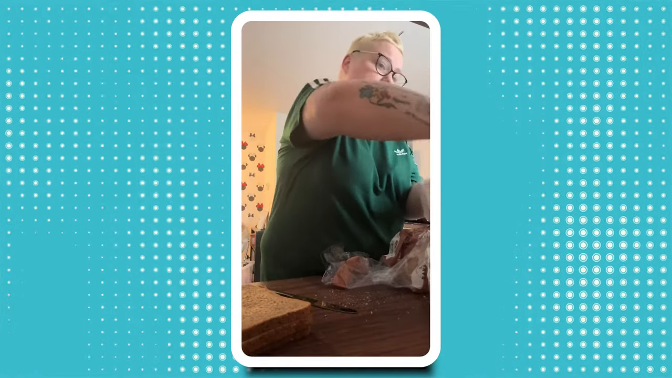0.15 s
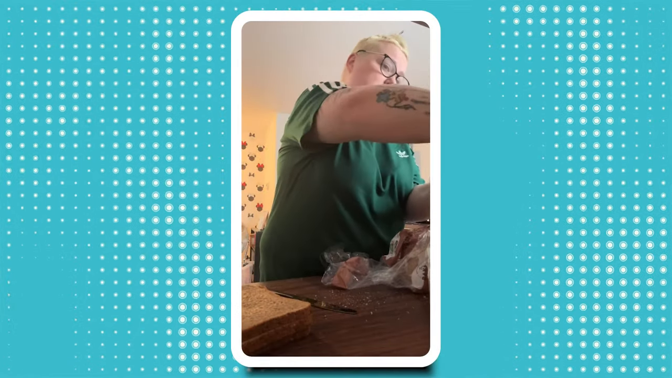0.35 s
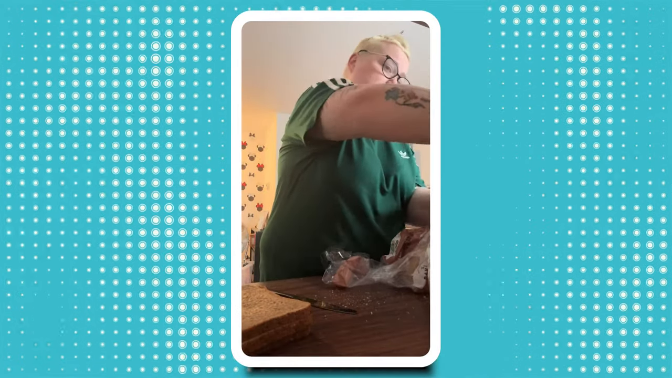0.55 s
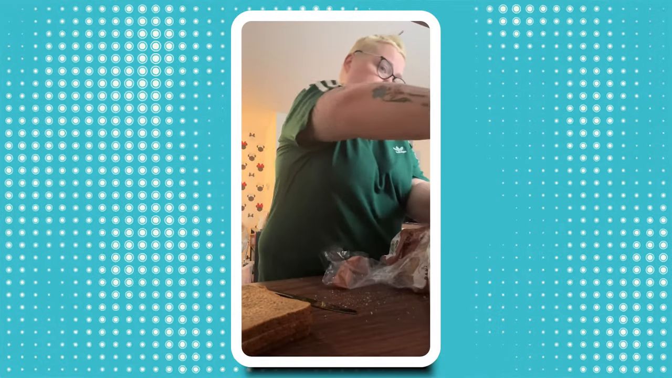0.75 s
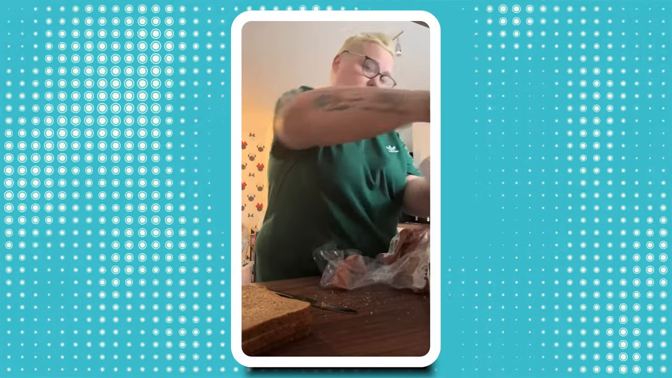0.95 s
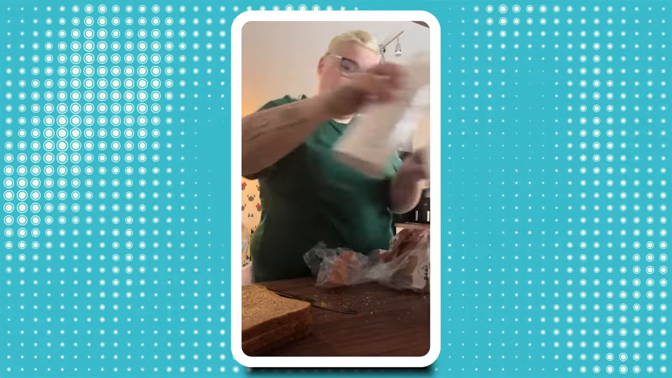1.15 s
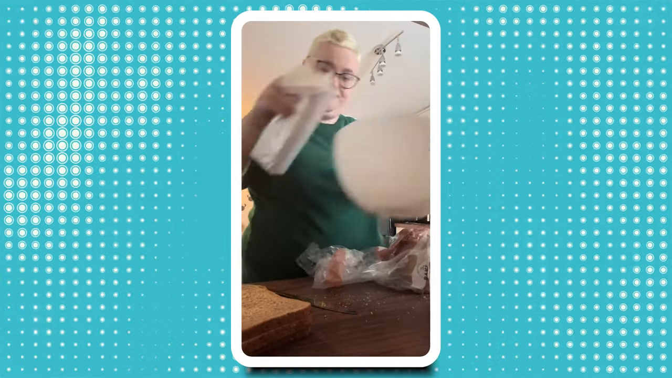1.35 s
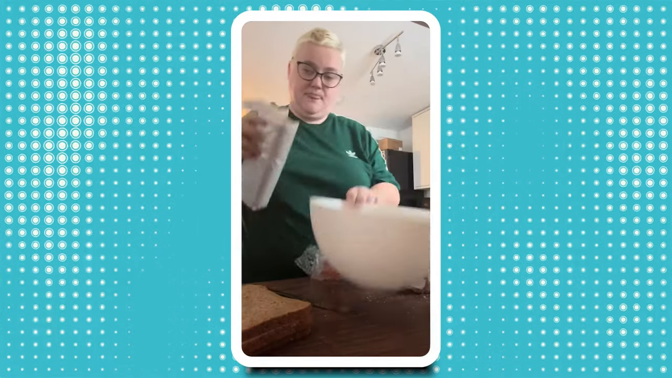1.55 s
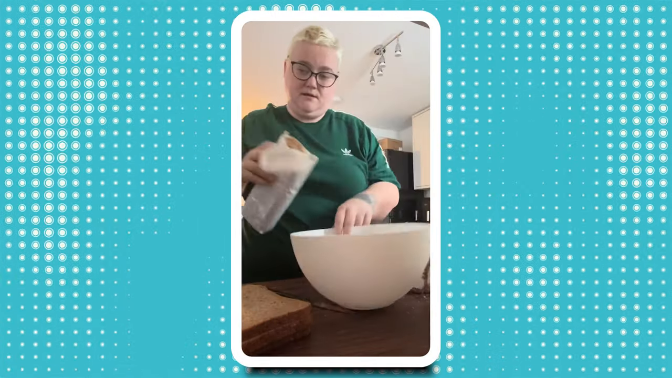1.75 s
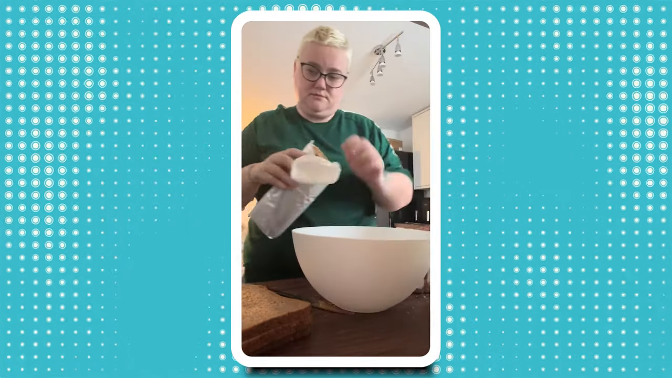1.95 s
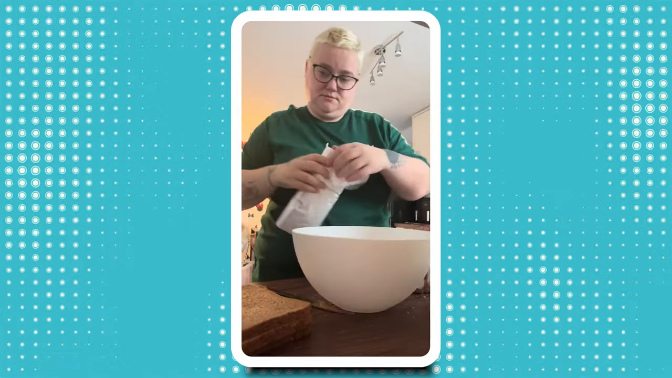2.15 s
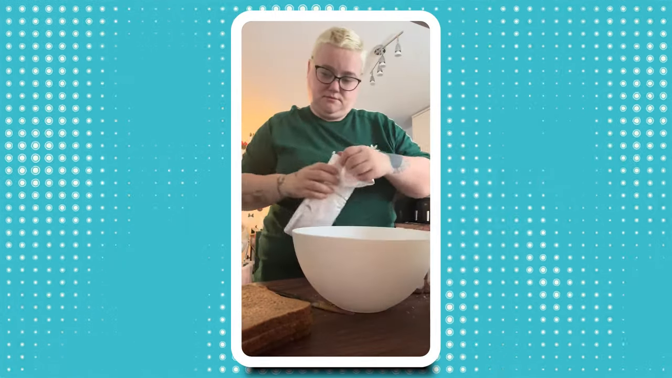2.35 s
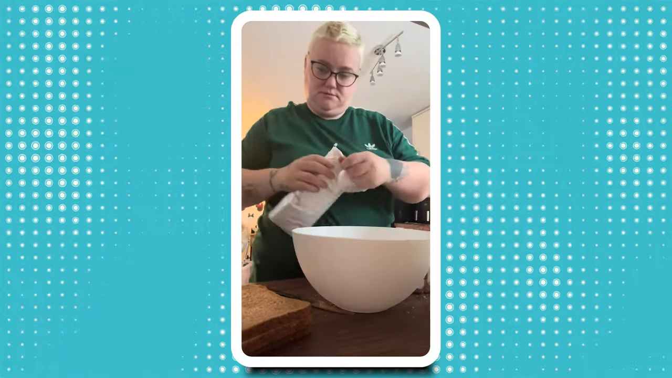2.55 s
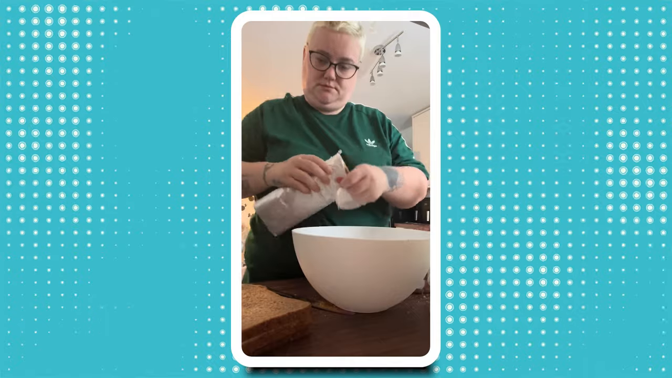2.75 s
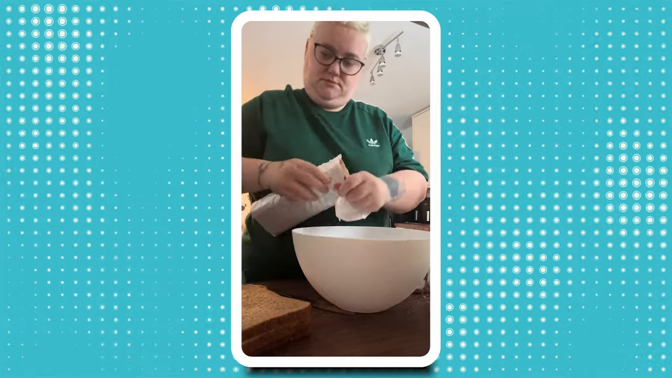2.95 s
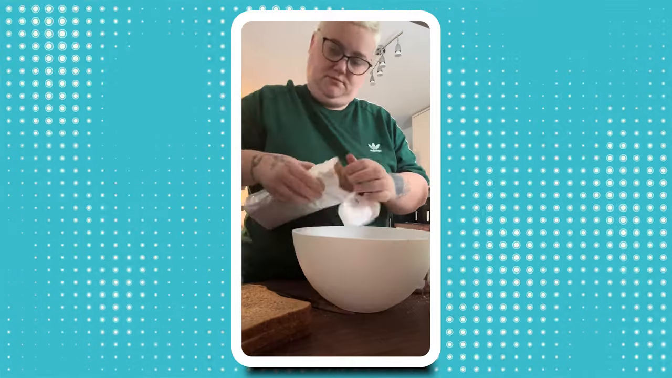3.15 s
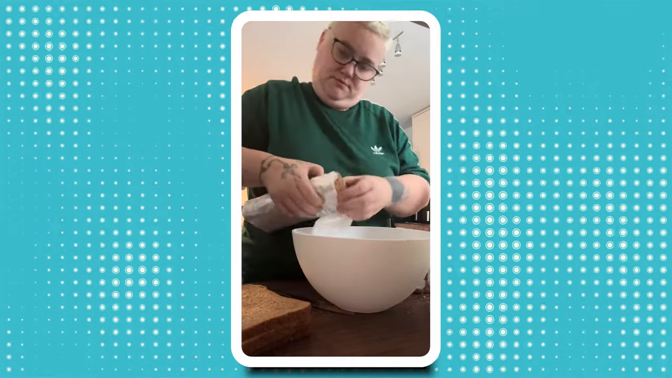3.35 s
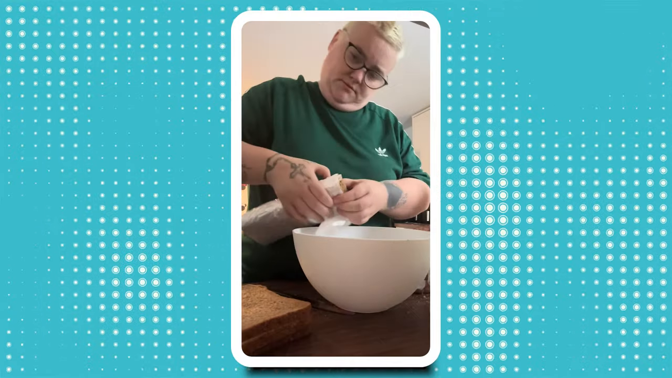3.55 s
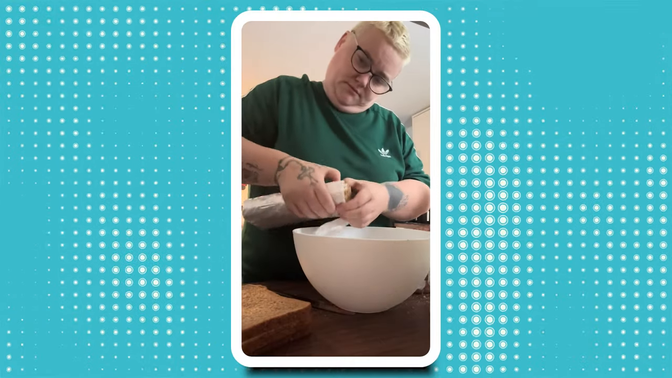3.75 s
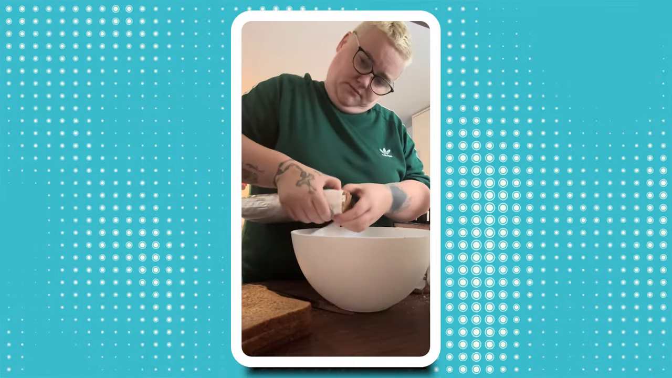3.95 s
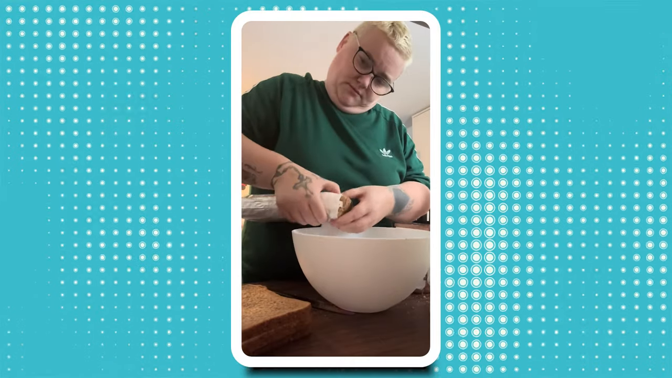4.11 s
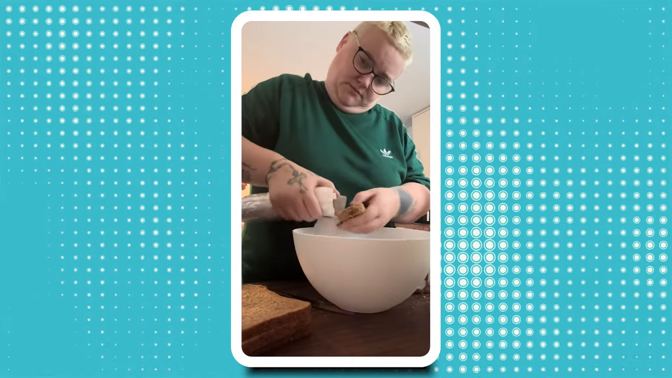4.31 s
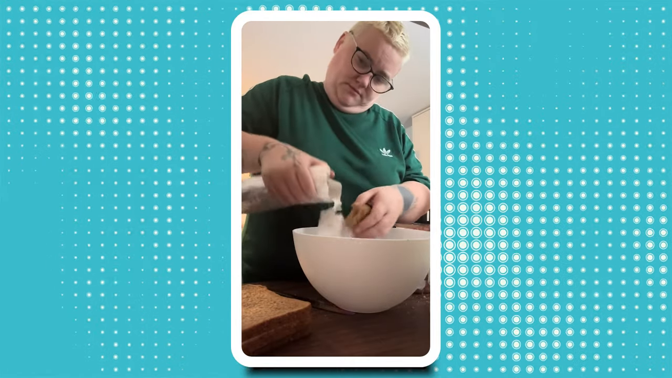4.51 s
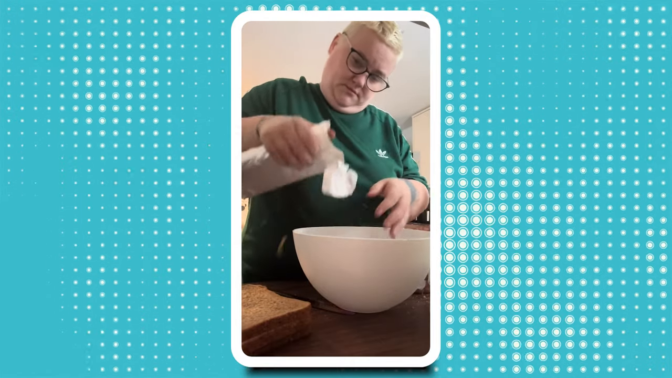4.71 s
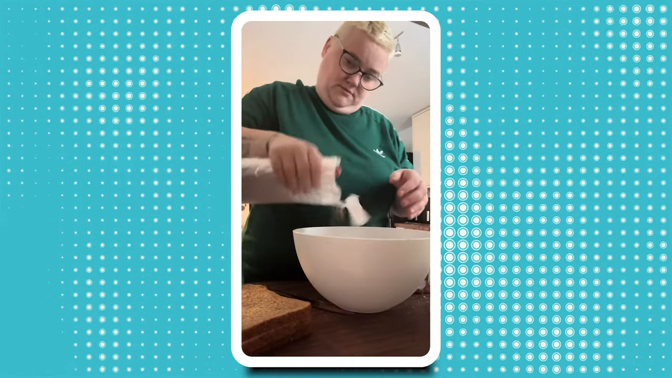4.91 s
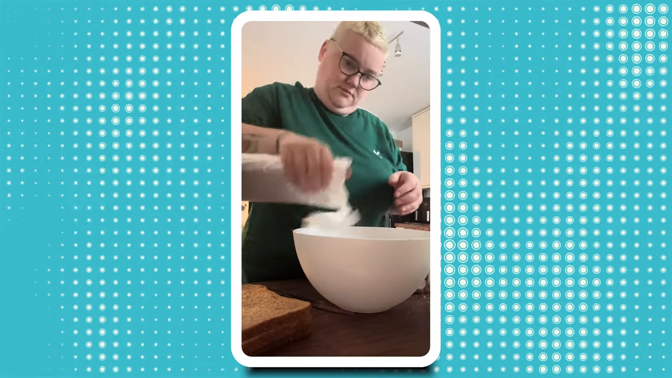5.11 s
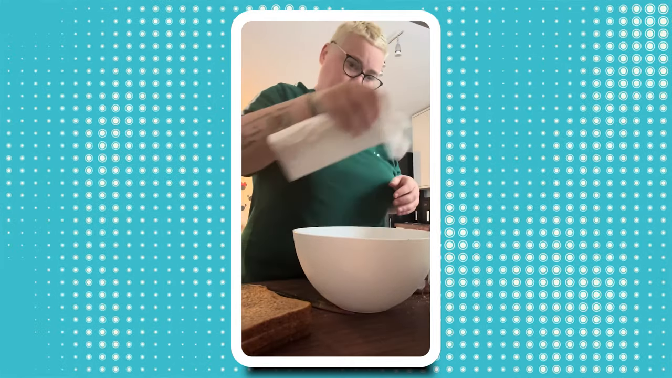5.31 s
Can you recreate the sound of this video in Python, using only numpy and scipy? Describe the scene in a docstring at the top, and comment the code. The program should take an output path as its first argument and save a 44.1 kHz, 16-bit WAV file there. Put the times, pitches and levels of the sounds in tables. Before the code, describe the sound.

A paper packet crinkles, a plastic bowl scrapes and clunks onto a wooden counter, then a dry biscuit drops and rattles into it.

```python
"""A kitchen: a paper packet of cereal biscuits is crinkled and torn open near a phone on the counter.
The wrapper is dense small creases of noise, single snaps that ring the paper, and bright ticks of film.
A plastic bowl is dragged off a shelf, bumped and set down, and a dry biscuit bounces in it: struck modes
with sprays of fracture noise. The counter booms in low modes, a fridge hums in sines and whirs in
shaped noise, and the walls answer with short decaying noise echoes."""
import sys
import numpy as np
from scipy import signal
from scipy.fft import rfft, irfft, next_fast_len
from scipy.io import wavfile
from scipy.ndimage import uniform_filter1d

SR = 44100
rng = np.random.default_rng(int(sys.argv[2]) if len(sys.argv) > 2 else 0)


def output_pcm(signal):
    """Save a mono or channel-first signal as 16-bit PCM at the path in sys.argv[1].

    Samples are clipped to [-1, 1] before scaling.
    """
    pcm = np.clip(np.atleast_2d(signal).T, -1, 1) * 32767
    wavfile.write(sys.argv[1], SR, np.round(pcm).astype(np.int16))


def linear_from_db(decibels):
    """Turn decibels (scalar or array-like) into linear amplitude factors; 0 gives 1."""
    return 10 ** (np.asarray(decibels, float) / 20)


N = 241491
T = np.arange(N) / SR

# hands working the wrapper: [t/s, middle level/dB, low flap of the sheet/dB, treble/dB]
HANDS = [(0.0, -52, -62, -53.5), (0.1, -55.5, -61, -57), (0.149, -48.5, -43, -51.5),
         (0.3, -41.5, -46, -40.5), (0.44, -44, -49, -45.5), (0.58, -47.5, -50.5, -50),
         (0.82, -57, -50, -53.5), (0.94, -47.5, -66, -50.5), (1.02, -58, -63, -58.5), (1.28, -57, -61, -61),
         (1.4, -48.5, -48.5, -54.5), (1.56, -43, -40, -44.5), (1.71, -44.5, -42, -59.5),
         (1.91, -46.5, -41, -72), (2.099, -59.5, -64, -59), (2.188, -42, -37.5, -45),
         (2.3, -42, -45.5, -42.5), (2.37, -45.5, -46, -44.5), (2.45, -45, -47.5, -49),
         (2.51, -51.5, -49.5, -47.5), (2.62, -41, -46, -44.5), (2.65, -58, -70, -51),
         (2.68, -54, -49, -55.5), (2.74, -45.5, -55, -45.5), (2.79, -47, -51.5, -48.5),
         (2.87, -53, -56, -50), (2.9, -55, -53, -51), (2.935, -48.5, -59, -49), (3.05, -42.5, -50.5, -44.5),
         (3.13, -50.5, -54, -57), (3.185, -53, -59, -55), (3.2, -51, -53, -53), (3.26, -41, -51, -45.5),
         (3.31, -43, -48, -42.5), (3.36, -41.5, -50.5, -42.5), (3.41, -50, -44, -49.5),
         (3.47, -36, -45, -51), (3.53, -46, -46, -46), (3.63, -42, -50.5, -46.5), (3.77, -43, -51, -39.5),
         (3.811, -45, -49, -44), (3.86, -42, -49, -41.5), (4.05, -41.5, -50, -41),
         (4.129, -34.5, -38, -34.5), (4.25, -45.5, -48.5, -51), (4.33, -43, -48, -52),
         (4.4, -50.5, -56.5, -51), (4.58, -49.5, -69, -54), (4.66, -42, -55, -69), (4.9, -51, -60, -50),
         (5.06, -52.5, -85, -50.5), (5.48, -58, -81, -65)]
# flap of the sheet, higher while the packet is wedged on the shelf: [t/s, f/Hz]
FLAP = [(0.0, 870), (0.7, 850), (0.8, 580), (5.48, 606)]
# treble and rustle colour of the wrapper: [f/Hz, relative level/dB]
WRAPPER = [(200, -8), (330, -3), (520, 2.5), (980, 0), (1320, -7.5), (2000, -4.5), (2740, -4.5),
           (3580, -9.5), (4280, -6), (4830, -13.5), (5600, -12), (7000, -19), (15000, -12.5)]
# modes of the free bowl, before each use shortens or scatters them: [f/Hz, level/dB, t60/s]
BOWL = [(226, 2.5, 0.11), (299, -1, 0.048), (451, 9, 0.041), (545.5, -1, 0.062), (663, 3, 0.049),
        (829, 11, 0.026), (1095, -1.5, 0.03), (1266, 10.5, 0.014), (1600, 13.5, 0.029), (1800, 1.5, 0.051),
        (2088, 5.5, 0.04), (2400, -1, 0.048), (2500, 2.5, 0.053), (2660, 14, 0.015), (3050, 7, 0.039),
        (3470, 5.5, 0.049), (3790, 6, 0.047)]


def on(table, hz):
    """Gain at the given frequencies, from [f/Hz, level/dB] points joined on a log frequency axis."""
    f, db = np.transpose(table)
    return linear_from_db(np.interp(np.log(np.maximum(hz, 1)), np.log(f), db))


def colour(x, table):
    """Filter the last axis by [f/Hz, level/dB] points."""
    size = next_fast_len(x.shape[-1])
    gain = on(table, np.fft.rfftfreq(size, 1 / SR))
    return irfft(rfft(x, size) * gain, size)[..., :x.shape[-1]]


def band(x, lo_hz, hi_hz):
    """Causal Butterworth band-pass."""
    sos = signal.butter(2, [lo_hz, hi_hz], "bandpass", fs=SR, output="sos")
    return signal.sosfilt(sos, x)


def unit(x):
    """Scale to rms 1."""
    return x / np.sqrt(np.mean(x ** 2))


def add(out, s, db, sound):
    """Mix a short sound in from time s with the given peak."""
    i = int(s * SR)
    piece = sound[:N - i]
    out[i:i + len(piece)] += linear_from_db(db) * piece / np.abs(sound).max()


def swell(t, rise_s, t60):
    """Envelope that grows while the contact lasts, then dies."""
    rise = np.sin(np.pi / 2 * np.minimum(t / rise_s, 1)) ** 3
    return rise * np.exp(-np.log(1000) * t / t60)


def ring(hz, t60, rise_s, length_s=.2):
    """One struck mode: a sine under a swell."""
    t = np.arange(int(length_s * SR)) / SR
    return swell(t, rise_s, t60) * np.sin(2 * np.pi * hz * t)


def crack(lo_hz, hi_hz, t60, rise_s):
    """A spray of tiny fractures: a swell of noise in one band."""
    t = np.arange(4096) / SR
    return band(rng.standard_normal(len(t)) * swell(t, rise_s, t60), lo_hz, hi_hz)


def walk(rate):
    """Random levels held 1 / rate s and slewed; spread near 1."""
    k = int(SR / rate)
    held = np.repeat(rng.standard_normal(N // k + 1), k)
    return 1.2 * uniform_filter1d(held, k)[:N]


def fridge():
    """Smooth fan whir of coloured noise, and motor hum of sines that waver in level and pitch."""
    # spectrum of the fan: [f/Hz, relative level/dB]
    whir_colour = [(25, -46), (40, -3.5), (60, -13), (119, -5.5), (290, -15.5), (444, -14.5), (763, -15.5),
                   (1090, -36.5), (1500, -27.5), (1750, -12.5), (2150, -15.5), (2600, -36.5), (4580, -32),
                   (7000, -50), (15000, -35)]
    # motor hum: [mean f/Hz, mean level/dB]
    hum_lines = [(55, -65), (100, -63), (124, -78)]
    sound = linear_from_db(-54.5) * unit(colour(rng.standard_normal(N), whir_colour))
    for hz, db in hum_lines:
        level = linear_from_db(db + 1.5 * walk(1.2))
        wavering_hz = hz * (1 + 0.00607 * walk(1.74))
        sound += level * np.sin(2 * np.pi * np.cumsum(wavering_hz) / SR)
    return sound


def counter():
    """The worktop booms after weight lands on it; its close modes beat."""
    # thuds: [t/s, peak/dB, main f/Hz, t60/s]
    thuds = [(0.795, -33.5, 110, 0.089), (0.923, -30.5, 130, 0.12), (0.932, -25, 115.2, 0.19),
             (1.648, -16.5, 139.4, 0.12), (1.697, -22, 130, 0.22), (1.763, -34, 131.3, 0.64),
             (1.841, -26.5, 144, 0.16), (1.885, -31.5, 151.7, 0.3), (1.919, -34.5, 139, 0.43),
             (1.982, -33.5, 133, 0.2), (3.563, -35.5, 139.7, 0.38), (3.617, -34.5, 131, 0.19),
             (4.137, -30.5, 132.6, 0.19), (4.609, -19, 131.6, 0.16), (4.66, -26, 131.1, 0.41),
             (4.703, -30.5, 122.7, 0.17), (4.741, -22.5, 131, 0.19)]
    # the worktop's own modes, against the main one: [f/Hz, level/dB]
    worktop_modes = [(100, -35.5), (123, -8), (147, -6), (185, -10)]
    out = np.zeros(N)
    for s, db, hz, t60 in thuds:
        boom = ring(hz, t60, 0.0079, .3)
        for mode_hz, mode_db in worktop_modes:
            boom += linear_from_db(mode_db) * ring(mode_hz, t60, 0.015, .3)
        knock = 0.35 * ring(240, 0.05, 0.0024, .3)
        add(out, s, db, boom + knock)
    return out


def drag():
    """Uneven slips shake the shelf, the wall of the bowl and its rim."""
    # bowl dragged along the shelf: [t/s, shelf level/dB, bowl wall level/dB, bowl rim level/dB]
    drag_levels = [(0.76, -56, -48, -79), (0.792, -41.5, -63, -65), (0.802, -34, -43, -39.5),
                   (0.835, -34, -46, -44.5), (0.848, -49, -50, -45), (0.862, -41, -40.5, -37),
                   (0.894, -41, -41.5, -41), (0.908, -55, -51.5, -44), (0.934, -46.5, -62, -51),
                   (0.986, -56, -56, -51), (1.0, -75, -68, -45)]
    shelf_hz, shelf_width_hz = 205.4, 33
    held_t60_share = 0.4  # a hand on the bowl shortens its rings
    s, *levels = np.transpose(drag_levels)
    slips = rng.standard_normal(N) * linear_from_db(3 * walk(120))
    shelf = band(slips, shelf_hz - shelf_width_hz / 2, shelf_hz + shelf_width_hz / 2)
    response = sum(linear_from_db(db) * ring(hz, held_t60_share * t60, 0.0073) for hz, db, t60 in BOWL)
    body = signal.fftconvolve(slips, response)[:N]
    parts = shelf, band(body, 370, 910), band(body, 1500, 2720)
    out = np.zeros(N)
    for part, db in zip(parts, levels):
        out += linear_from_db(np.interp(T, s, db, left=-120, right=-120)) * unit(part)
    return out


def bumps():
    """Fingers drum on the held bowl: long soft contact wakes mostly its hollow note, with a weaker mode just
    above it and a faint spray of crack noise."""
    # soft finger taps: [t/s, peak/dB]
    finger_taps = [(1.357, -28.5), (1.379, -30), (1.403, -33), (1.411, -19), (1.44, -24), (1.45, -27),
                   (1.47, -24.5), (1.488, -37)]
    out = np.zeros(N)
    for s, db in finger_taps:
        hollow_hz = 450 * (1 + 0.02 * rng.standard_normal())
        upper = ring(1.187 * hollow_hz, 0.032, 0.0081)
        add(out, s, db, ring(hollow_hz, 0.045, 0.012) - 0.67 * upper)
        add(out, s + .004, db - 16, crack(600, 1100, 0.03, 0.005))
    return out


def bowl():
    """Every blow rings the same modes, most those near the struck spot; hard contact wakes the high ones."""
    # blows on the bowl: [t/s, wall peak/dB, loudest wall f/Hz, loudest rim f/Hz,
    # hard edge re wall/dB, brittle crack re wall/dB]
    knocks = [(0.921, -32, 463, 2080, -19, -29), (1.352, -38, 800, 2120, 7, -21),
              (1.371, -38.5, 504, 2000, 12.5, -22), (1.636, -24.5, 310, 2600, 1, -16),
              (1.642, -26, 330, 2740, 10, -13), (1.645, -6, 548, 2120, -8.5, -25),
              (1.694, -8.5, 487, 2180, -10, -39), (1.68, -33, 496, 2000, -15, -35),
              (1.721, -19.5, 447, 1900, -16, -44), (1.748, -30, 904, 1920, -5, -8),
              (1.763, -32, 468, 1750, 5, -31), (1.805, -39, 566, 2100, 1, 6),
              (1.828, -20, 645, 2120, 4, -7.5), (1.844, -20.5, 716, 2100, 1.5, -38),
              (1.903, -34, 305, 2220, 10.5, 2), (1.971, -29.5, 620, 1960, 4, -3),
              (2.008, -39, 560, 2100, -4, -8)]
    # the biscuit dropping and bouncing in the bowl: columns as for the knocks
    biscuit_drops = [(4.608, -10, 1310, 3000, -7.5, -7), (4.610, -12, 690, 2110, -4.5, -14),
                     (4.621, -23, 760, 2100, 3, -28), (4.632, -18.5, 894, 2400, 5, -11),
                     (4.643, -29, 570, 2400, -1, -29), (4.663, -29, 640, 1600, -1, -24),
                     (4.699, -21.5, 670, 2000, 3, 1), (4.72, -31.5, 657, 2060, -0.5, -24),
                     (4.736, -22.5, 487, 2000, 2.5, 4), (4.739, -19, 510, 2400, 1.5, -21),
                     (4.755, -32, 590, 2400, -8, -29)]
    # no two blows bend the bowl alike: spread of each mode's pitch and level
    detune_share, scatter_db = 0.008, 1.5
    hz, db, t60 = np.transpose(BOWL)
    low = hz < 1500
    signs = (-1) ** np.arange(len(hz))
    out = np.zeros(N)
    # the biscuit's own weight shortens the rim's ring further
    for blows, rim_t60_share, contact_s in (knocks, 0.75, 0.0019), (biscuit_drops, 0.6, 0.003):
        mode_t60 = t60 * np.where(low, 1, rim_t60_share)
        rise_s = contact_s * np.where(low, 1, 1.6)
        for s, blow_db, wall_hz, rim_hz, edge_db, crack_db in blows:
            detune, scatter = rng.standard_normal((2, len(hz)))
            mode_hz = hz * (1 + detune_share * detune)
            rings = np.array([ring(f, decay, rise, .12) for f, decay, rise in zip(mode_hz, mode_t60, rise_s)])
            rings *= linear_from_db(scatter_db * scatter)[:, None]
            # modes fade by the octave away from the struck spot
            octaves = np.abs(np.log2(hz / np.where(low, wall_hz, rim_hz)))
            share = signs * linear_from_db(db - np.where(low, 16, 45) * octaves)
            add(out, s - .0015, blow_db, (share * low) @ rings)
            add(out, s - .0015, blow_db + edge_db, (share * ~low) @ rings)
            add(out, s - .002, blow_db - 15, crack(600, 1100, 0.02, 0.002))
            add(out, s - .002, blow_db + edge_db - 7.5, crack(1300, 3800, 0.025, 0.003))
            brittle = colour(crack(2200, 17000, 0.03, 0.0021), WRAPPER)
            add(out, s - .002, blow_db + crack_db, brittle)
    return out


def creases(per_s):
    """Envelope of chance small creases of uneven size, each smeared by a short decay."""
    spread_db, smear_s = 5.2, .0012
    hit = rng.random(N) < per_s / SR
    clicks = hit * linear_from_db(spread_db * rng.exponential(size=N).clip(0, 3))
    power = signal.lfilter([1], [1, -np.exp(-1 / SR / smear_s)], clicks ** 2)
    return np.sqrt(power / per_s)


def rustle():
    """Dense small creases in clusters; some sound in all bands, some in one colour only."""
    # thick while the packet is pulled out, sparser while fingers pick at it: [t/s, creases per s]
    crease_rate = [(0.0, 1000), (1.5, 900), (2.1, 400), (3.7, 400), (3.9, 600), (5.48, 500)]
    s, mid_db, low_db, treble_db = np.transpose(HANDS)
    per_s = np.interp(T, *np.transpose(crease_rate))
    flap_hz = np.interp(T, *np.transpose(FLAP))
    shared, clusters = creases(per_s), linear_from_db(2.2 * walk(45))
    ranges = [((200, 420, 750, 1150), low_db),
              ((1150, 1700, 2400, 3500), mid_db),
              ((3500, 4800, 6300, 16000), treble_db)]
    out = np.zeros(N)
    for edges, db in ranges:
        sheet = np.zeros(N)
        for lo, hi in zip(edges, edges[1:]):
            grains = band((0.24 * shared + creases(per_s)) * rng.standard_normal(N), lo, hi)
            if db is low_db:  # low bands fade 8 dB an octave away from the flap
                grains *= linear_from_db(-8 * np.abs(np.log2(np.sqrt(lo * hi) / flap_hz)))
            sheet += grains
        out += linear_from_db(np.interp(T, s, db)) * unit(colour(sheet * clusters, WRAPPER))
    return out


def ticks():
    """A tiny fold of film flicks over: a short burst of treble."""
    # fine bright ticks: [t/s, peak/dB, f/Hz]
    film_ticks = [(2.147, -34, 4120), (2.1665, -28, 4420), (2.196, -29, 5660), (2.232, -38, 4380),
                  (2.3302, -42, 4140), (2.361, -37, 4270), (2.38, -30, 4280), (2.3937, -42, 4280),
                  (2.4147, -33, 4370), (2.453, -28, 4030), (2.6126, -34, 4190), (2.728, -36, 4180),
                  (2.7379, -47, 4290), (2.7574, -38, 4260), (2.7958, -24.5, 4100), (2.821, -31.5, 3900),
                  (3.0068, -33, 3970), (3.0232, -32, 4130), (3.0755, -30, 4150), (3.1927, -38, 4540),
                  (3.2198, -32, 4520), (3.2495, -30, 5040), (3.2767, -27, 3960), (3.3326, -25, 4170),
                  (3.362, -40, 4050), (3.428, -29, 4150), (3.4383, -41, 4050), (3.4682, -21, 4100),
                  (3.4816, -21, 4550), (3.584, -26, 4140), (3.625, -31, 4150), (3.684, -33, 4160),
                  (3.7215, -35, 4130), (3.743, -36, 4330), (3.7649, -27, 5170), (3.8908, -34, 4470),
                  (3.9463, -25.5, 5560), (3.982, -29, 5590), (4.039, -29, 5530), (4.066, -29, 4210),
                  (4.0823, -21.5, 5600), (4.113, -33, 4250), (4.1787, -31, 4130), (4.3089, -33, 5470)]
    out = np.zeros(N)
    for s, db, hz in film_ticks:
        add(out, s, db, crack(hz / 1.43, hz * 1.15, 0.016, 0.00055))
    return out


def faint_creases():
    """Faint creases at chance moments, as rows for snaps(), as strong as the hands are busy."""
    # patches of paper that ring: [f/Hz]
    patches_hz = [1650, 1950, 2700]
    faint_per_s = 5
    s, hands_db = np.transpose(HANDS)[:2]
    count = int(faint_per_s * N / SR)
    when, patch = rng.random((count, 2)).T
    size, flap, treble = rng.standard_normal((count, 3)).T
    at = (np.arange(count) + when) / faint_per_s
    db = np.interp(at, s, hands_db) + 9.5 + 1.1 * size
    hz = np.array(patches_hz)[(patch * len(patches_hz)).astype(int)]
    return list(zip(at, db, hz, -10 + 3.2 * flap, -4 + 3.1 * treble))


def snaps():
    """Each crease is a run of tiny fractures that rings a patch of paper, flaps the sheet and sprays treble."""
    # clearest creases: [loudest t/s, level/dB, ring f/Hz, low flap re level/dB, treble re level/dB]
    clear_snaps = [(0.119, -38, 1600, 2.5, 3.5), (0.133, -45, 1570, -6, -1), (0.154, -41, 1800, -13, 3),
                   (0.173, -32.5, 1650, -26, -8), (0.185, -35, 1690, -11, -3), (0.202, -36.5, 1800, -2, 4),
                   (0.226, -39, 2660, -27, 5), (0.298, -37, 2600, -8, -1), (0.347, -23.5, 1650, -37, -10),
                   (0.404, -30.5, 1910, -17, -8), (0.494, -33, 3000, -10, -5), (0.551, -37, 1880, 0, 5),
                   (0.569, -50, 1920, -1, -10), (0.611, -40.5, 1900, -7, 3.5), (0.68, -40, 1870, 2, -29),
                   (0.776, -43.5, 2280, 6.5, 2), (0.811, -39, 1900, 7, -25), (0.891, -28.5, 1950, -13, -35),
                   (0.959, -34, 1960, -13, -25), (1.104, -43, 1880, -19, -26),
                   (1.337, -38.5, 1940, -20, -1.5), (1.418, -29.5, 1800, -8, -20),
                   (1.444, -30, 1800, -16, -37), (1.472, -35, 1710, -9, -28),
                   (1.508, -35.5, 2000, -16, -20), (2.102, -41, 2100, -5.5, 3), (2.16, -35, 1870, -1, 3),
                   (2.175, -28.5, 1610, -6, 1.5), (2.203, -36, 2070, 5, -16), (2.216, -29.5, 1660, 0, -19),
                   (2.233, -33, 1800, -16, 4), (2.268, -30, 2060, -16, -3.5), (2.285, -30, 1700, -10, -20),
                   (2.308, -33, 1720, -18, -21), (2.32, -38.5, 1080, -6, -10), (2.343, -32, 2580, -12, -6),
                   (2.351, -30, 1620, -4, -15), (2.396, -36, 3260, 1, 7.5), (2.404, -30, 2400, -6, -10),
                   (2.414, -29, 2660, 5.5, 4.5), (2.429, -35, 2740, 4, -4), (2.455, -34, 1680, -25, 2),
                   (2.471, -28.5, 1060, -6, -22), (2.502, -43, 1200, 5, -12), (2.55, -39, 2280, 6, 3),
                   (2.565, -31, 2200, -7.5, -3), (2.59, -31.5, 1650, -12, -21), (2.614, -37, 2000, -4, -1),
                   (2.74, -39.5, 2140, -3, 3), (2.798, -25, 1146, -7, -11.5), (2.889, -28, 2700, -9, -4),
                   (2.962, -31.5, 990, -4.5, -26), (3.025, -42, 2000, -1, 3), (3.05, -41, 2310, -19, -3),
                   (3.083, -39.5, 1180, 8, -10), (2.985, -32.5, 1570, -5, -8), (3.078, -39, 3040, -13, 6),
                   (3.113, -35.5, 2020, 0.5, -20), (3.211, -35, 2800, -18, -1), (3.24, -39.5, 1170, 3, 2),
                   (3.253, -30, 3050, -8, -3), (3.335, -31, 3020, -8, 0), (3.47, -27.5, 3080, -14, -3),
                   (3.482, -35, 1830, -8, -2), (3.54, -34, 1750, -4, -4), (3.575, -25, 1830, -6, -8),
                   (3.59, -36, 1890, 7, 6.5), (3.632, -31, 3240, -2, -3), (3.65, -23.5, 2110, -1.5, -7),
                   (3.689, -33, 1950, -24, 0), (3.726, -33, 1560, 0, 3), (3.745, -32, 2700, -5, 0),
                   (3.767, -39.5, 2860, -4, 13), (3.781, -40, 1160, 9, -13), (3.9, -34, 1850, -3, 6.5),
                   (3.924, -38, 1960, -4, -9), (4.041, -32, 2700, -42, 1), (4.096, -34.5, 1950, -3, 5),
                   (4.117, -25, 1780, -10, -8), (4.125, -21.5, 1550, -21, -13), (4.139, -35, 1700, -9, -5),
                   (4.2, -33.5, 1650, 3.5, 0), (4.308, -27, 1770, -4.5, -6.5),
                   (4.32, -23.5, 1670, -5, -7.5), (4.335, -30, 1330, 0, -1.5), (4.435, -35, 1840, -3, -27),
                   (4.477, -35.5, 2060, -7, -2), (4.515, -35, 2090, -9.5, -2.5),
                   (4.887, -35.5, 2780, -27, -0.5), (5.087, -39, 2000, -3.5, -4),
                   (5.24, -40.5, 2120, -4, 3), (5.3, -29.5, 1850, -6.5, -2), (5.311, -31, 2340, -8.5, -0.5),
                   (5.37, -43, 2000, -22, 0), (5.424, -42, 2000, 3.5, -1), (5.437, -22.5, 2000, -19, -2)]
    # creases that give way all at once: [start t/s, then columns as for the clear snaps]
    pops = [(0.367, -22, 1800, -23, -26), (0.431, -45, 1720, -30, 14), (0.484, -20, 2700, -26, -8),
            (0.8492, -16.5, 1800, -31, -30), (2.758, -25, 2400, -21, -4), (4.275, -24, 1200, -19, -6),
            (2.684, -30, 2190, 1, -14), (2.843, -30.5, 1990, -17, -7), (2.949, -26, 2000, -23, -13),
            (3.008, -36.5, 2000, 0, -3), (3.193, -29.5, 2580, -5, 0), (3.278, -22.5, 1950, -7, -19),
            (3.326, -20, 1700, -32, -17), (3.439, -21.5, 1950, -0.5, -0.5), (4.396, -36, 1950, -12, -6)]
    snap_ms, pop_ms = 5, 3.4  # time scales at -30 dB
    halving_db = 30  # a stronger crease gives way faster: gain in level that halves its length
    lead = 1024  # samples kept ahead of the loudest moment
    out = np.zeros(N + 8192)
    t = (np.arange(4096) - lead) / SR
    for row in clear_snaps + pops + faint_creases():
        s, db, hz, flap_db, treble_db = row
        shrink = 2 ** (-(db + 30) / halving_db)
        if row in pops:
            shape = swell(np.maximum(t, 0), 0.00016, np.log(1000) * shrink * pop_ms / 1000)
        else:
            late = t / (snap_ms / 1000 * shrink)
            shape = np.where(late < 0, np.exp(-(late / 0.63) ** 2), np.exp(-np.abs(late) / 0.73))
        flap_hz = np.interp(s, *np.transpose(FLAP))
        grit = linear_from_db(3.5 * np.repeat(rng.standard_normal(128), 32))
        fractures = rng.standard_normal((4, len(t))) * shape * grit
        detune, phase = rng.random((2, 2))
        note_hz = [hz, flap_hz] * (1 + [0.04, 0.4] * (detune - .5))
        notes = shape * np.sin(2 * np.pi * (np.outer(note_hz, t) + phase[:, None]))
        spray = colour(band(fractures[3], 2900, 18000), WRAPPER)
        parts = [(db - 8, band(fractures[0], hz - 250, hz + 250)),
                 (db - 8, notes[0]),
                 (db + flap_db - 7, notes[1]),
                 (db - 9.5, band(fractures[1], 870, 2720)),
                 (db + flap_db - 7, band(fractures[2], 0.73 * flap_hz, 1.41 * flap_hz)),
                 (db + treble_db - 3, spray)]
        i = int(s * SR)
        energy = np.sum(shape ** 2)
        for part_db, x in parts:  # each part gets the energy of the envelope, then its level
            out[i:i + len(t)] += linear_from_db(part_db) * x * np.sqrt(energy / np.sum(x ** 2))
    return out[lead:lead + N]


def scene():
    """All sources, with short noise echoes of the walls that differ at the two microphone ports."""
    # colour of the echoes: [f/Hz, echo level/dB]
    wall_colour = [(100, -62), (200, -10.5), (400, -18.5), (800, -10), (1300, -5), (2400, -7), (4500, -1.5),
                   (8000, -3.5), (12000, 1)]
    walls_t60_s = 0.16
    near = fridge() + counter() + drag() + bumps() + bowl() + rustle() + ticks() + snaps()
    t = np.arange(16384) / SR
    echo = rng.standard_normal((2, len(t))) * np.exp(-np.log(1000) * t / walls_t60_s) * (t > .001)
    echo /= np.sqrt(np.sum(echo ** 2, axis=1, keepdims=True))
    return near + signal.fftconvolve(colour(near, wall_colour)[None], echo, axes=1)[:, :N]


def low_pass(x):
    """Removes everything above the highest recorded frequency."""
    return signal.sosfilt(signal.butter(12, 15860, fs=SR, output="sos"), x)


def record(dry):
    """The phone's port resonances, a right port nearer the counter, and a steep fall of the top."""
    # resonances of the microphone ports: [f/Hz, width/Hz, peak gain/dB]
    port_peaks = [(2000, 167, 5), (2700, 35, 5), (4140, 120, 1.5), (5465, 320, 2.5)]
    # balance of the ports: [f/Hz, left minus right/dB]
    left_minus_right = [(110, -0.5), (200, -2.5), (380, -5.5), (700, -5), (1290, -4.5), (2380, 0.5),
                        (4400, -0.5), (15000, 0.5)]
    # the phone keeps little above 7 kHz: [f/Hz, gain/dB]
    phone_top = [(25, -41), (45, 0.5), (7200, -6), (7650, -25), (8300, -36.5), (9200, -24.5),
                 (14300, -28.5), (15300, -39), (15900, -98)]
    size = next_fast_len(N)
    hz = np.fft.rfftfreq(size, 1 / SR)
    ports = np.prod([linear_from_db(db / (1 + (2 * (hz - f) / width) ** 2)) for f, width, db in port_peaks], axis=0)
    lean = np.sqrt(on(left_minus_right, hz))  # half the difference on each side
    gain = ports * on(phone_top, hz) * np.array([lean, 1 / lean])
    heard = irfft(rfft(dry, size) * gain, size)[:, :N]
    return low_pass(heard)


dry = scene()
out = record(dry)
output_pcm(out)
```